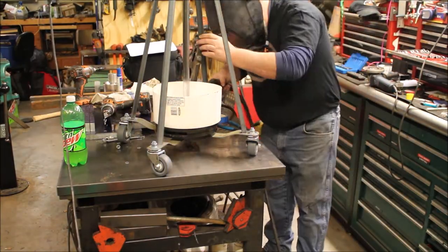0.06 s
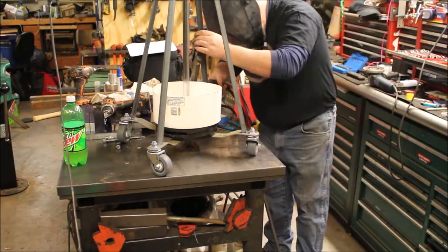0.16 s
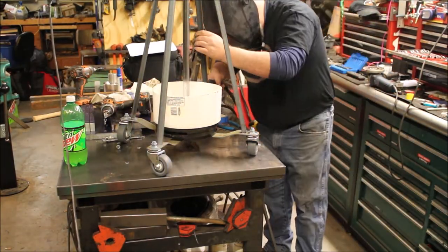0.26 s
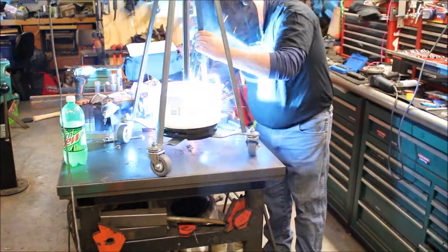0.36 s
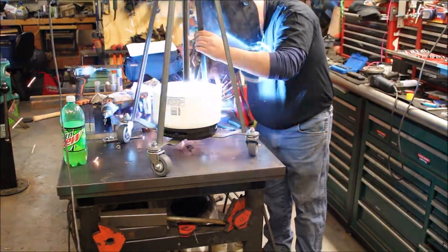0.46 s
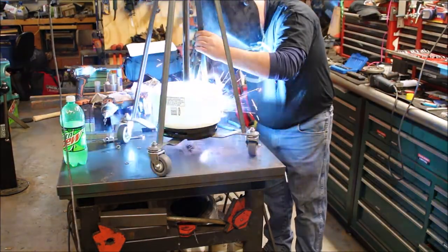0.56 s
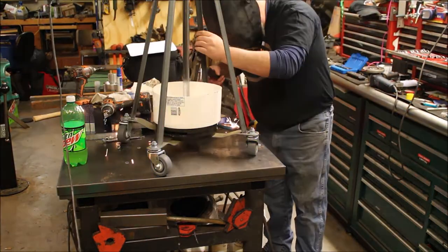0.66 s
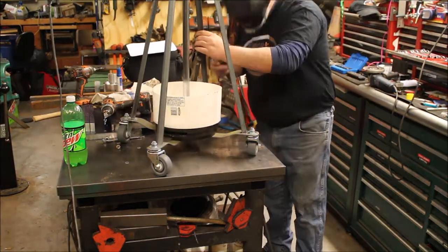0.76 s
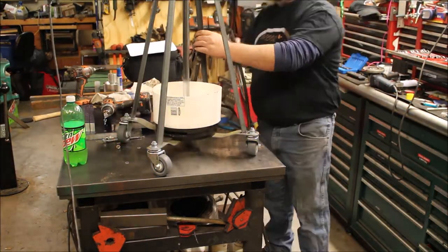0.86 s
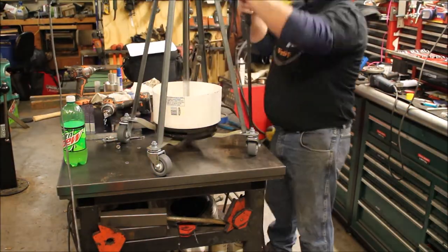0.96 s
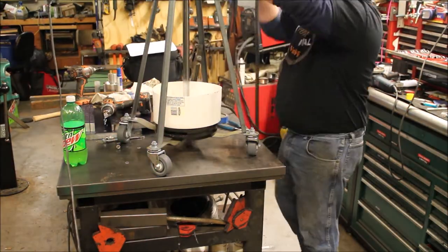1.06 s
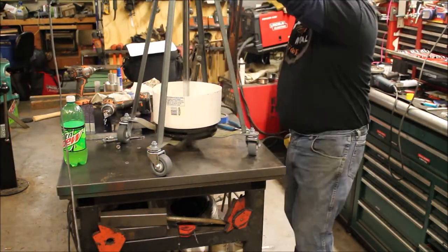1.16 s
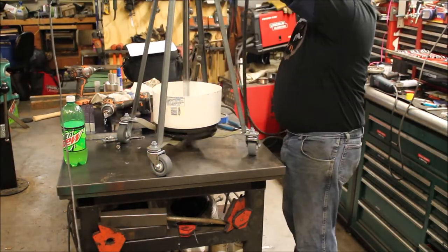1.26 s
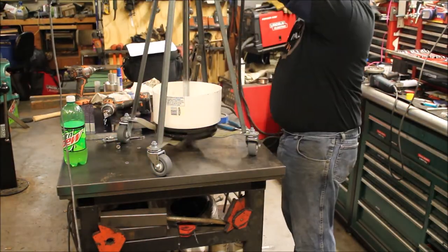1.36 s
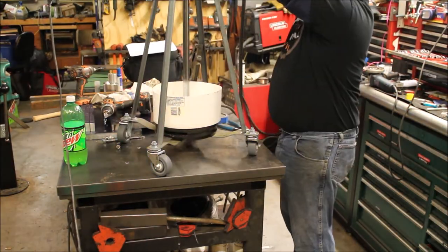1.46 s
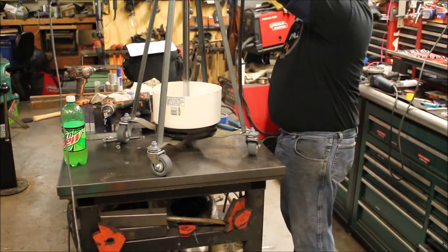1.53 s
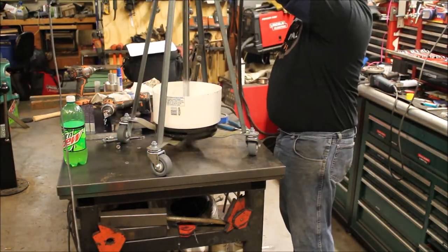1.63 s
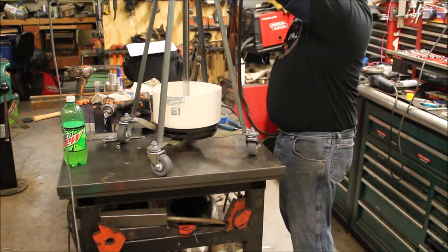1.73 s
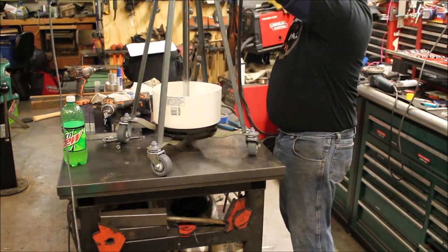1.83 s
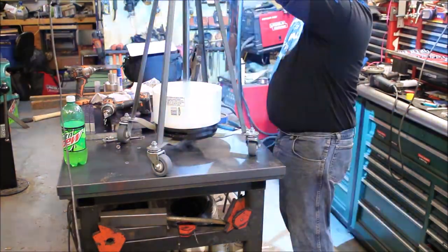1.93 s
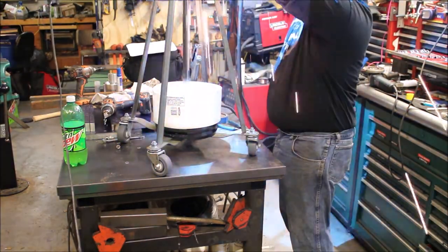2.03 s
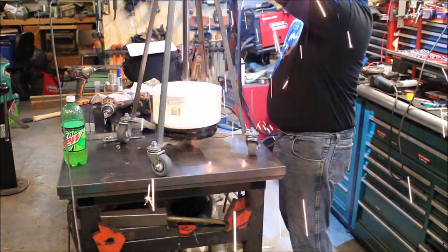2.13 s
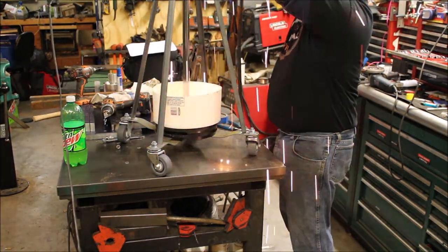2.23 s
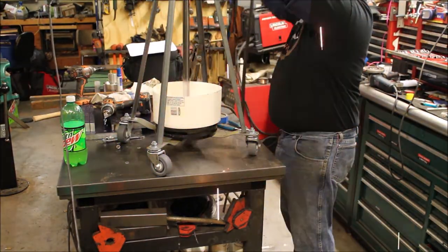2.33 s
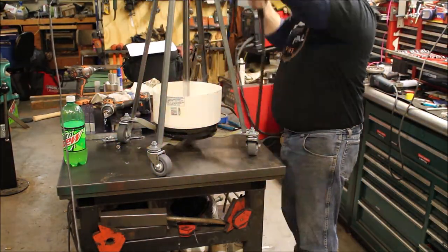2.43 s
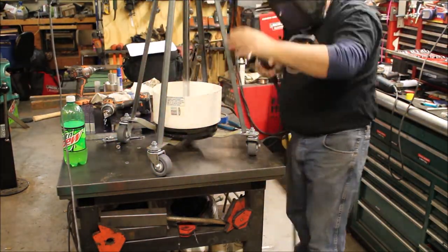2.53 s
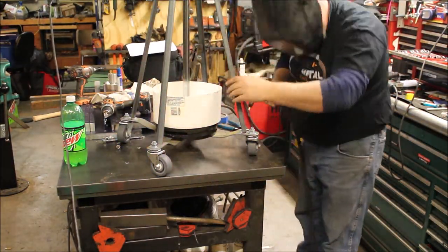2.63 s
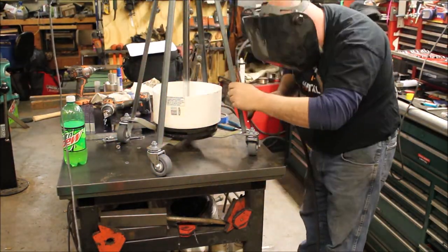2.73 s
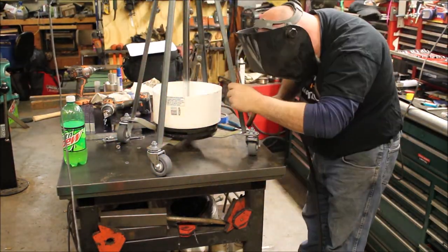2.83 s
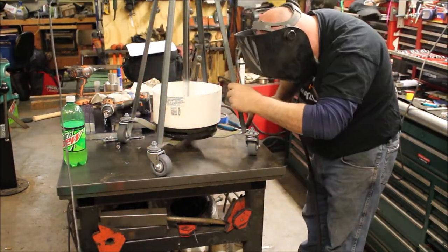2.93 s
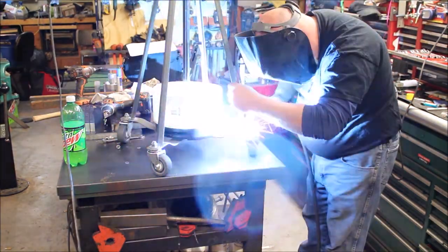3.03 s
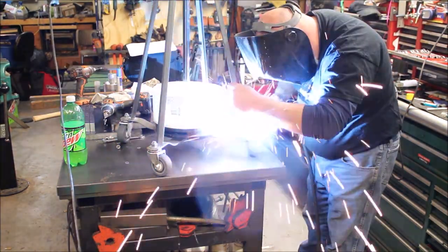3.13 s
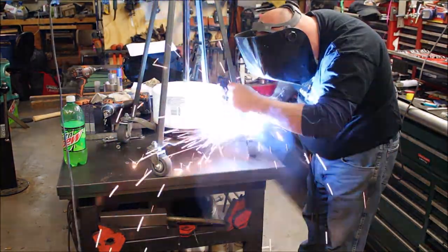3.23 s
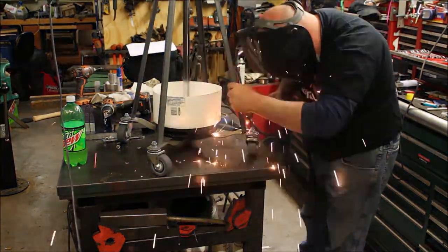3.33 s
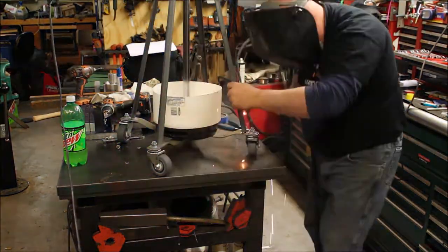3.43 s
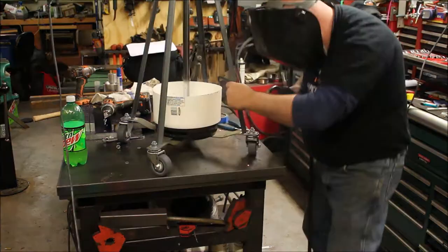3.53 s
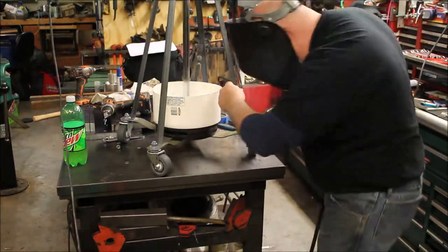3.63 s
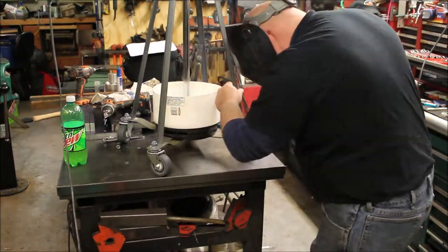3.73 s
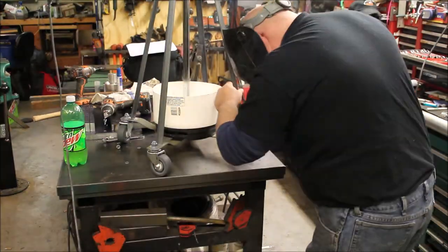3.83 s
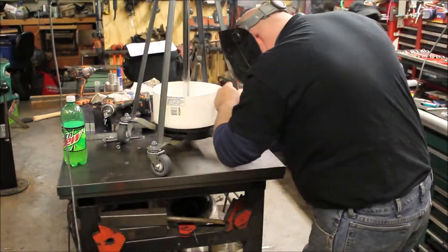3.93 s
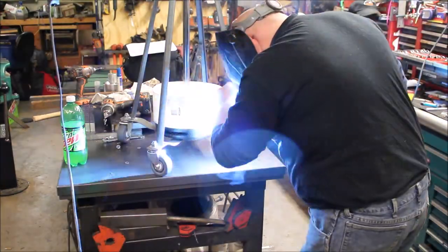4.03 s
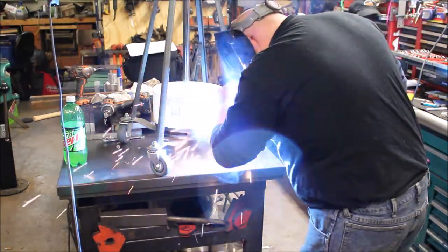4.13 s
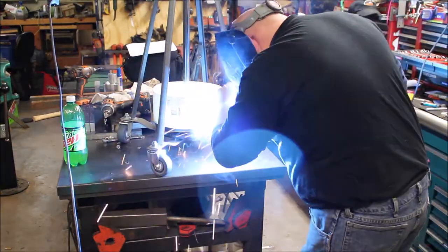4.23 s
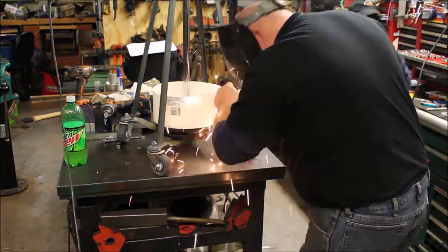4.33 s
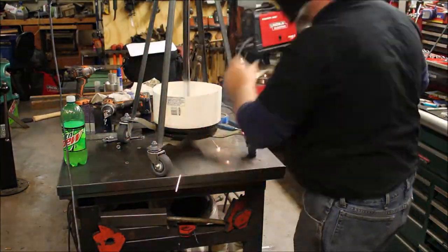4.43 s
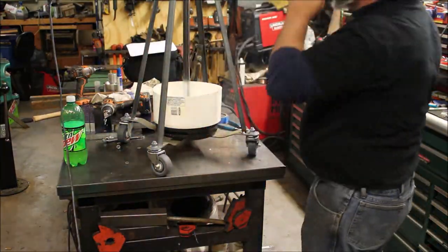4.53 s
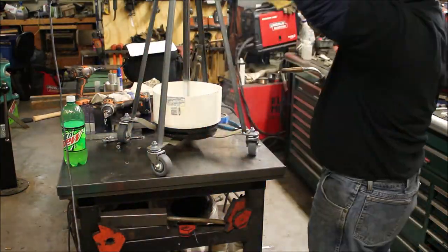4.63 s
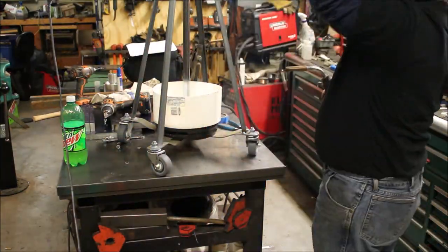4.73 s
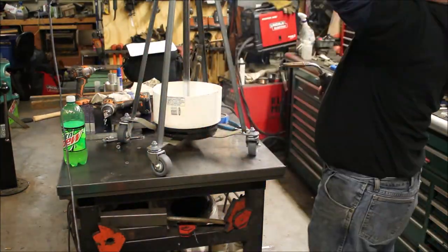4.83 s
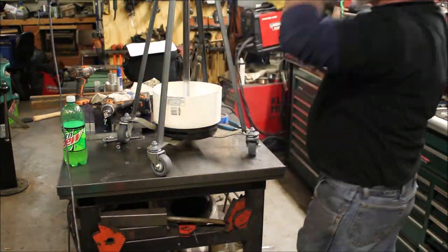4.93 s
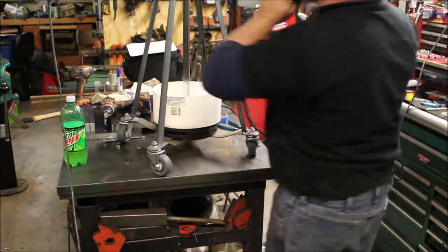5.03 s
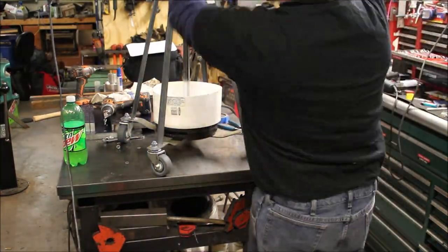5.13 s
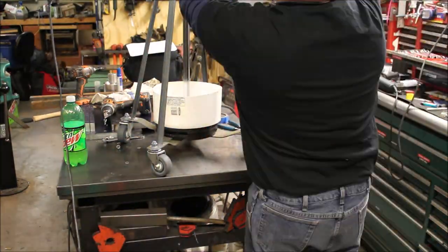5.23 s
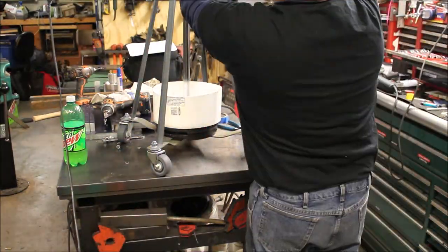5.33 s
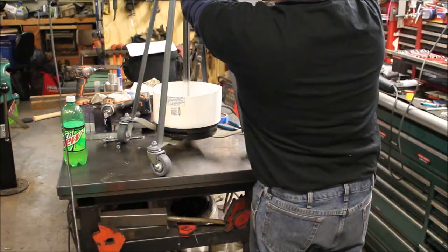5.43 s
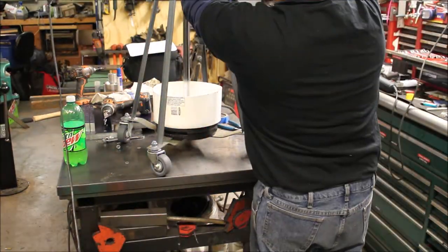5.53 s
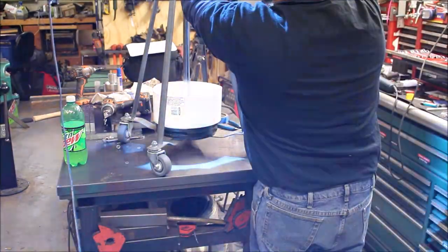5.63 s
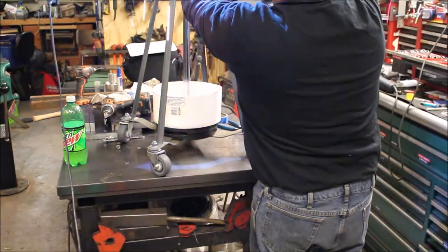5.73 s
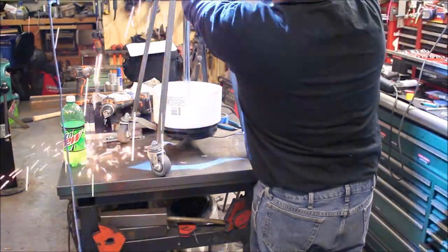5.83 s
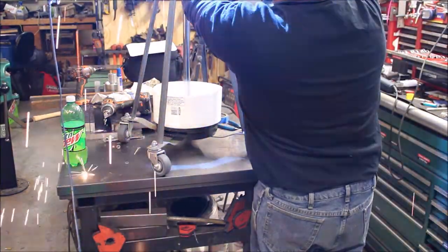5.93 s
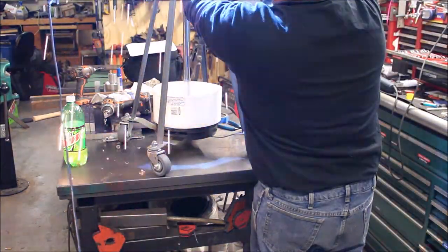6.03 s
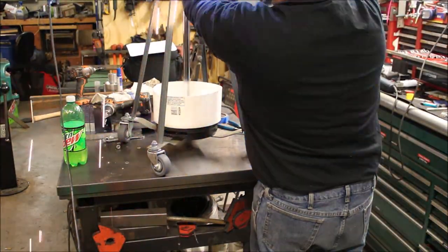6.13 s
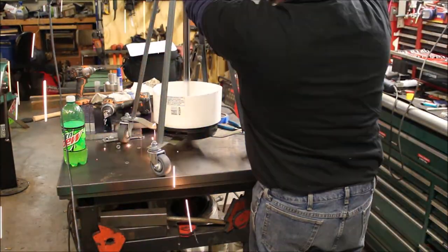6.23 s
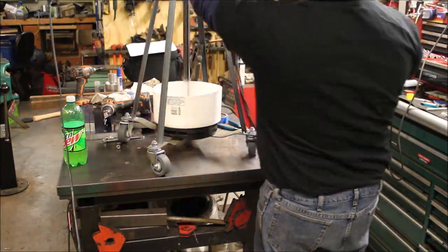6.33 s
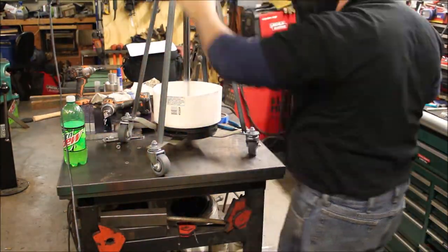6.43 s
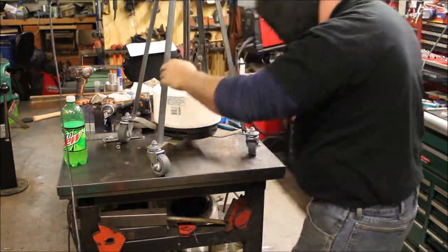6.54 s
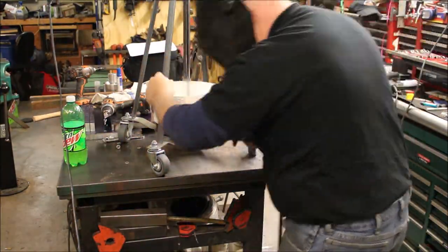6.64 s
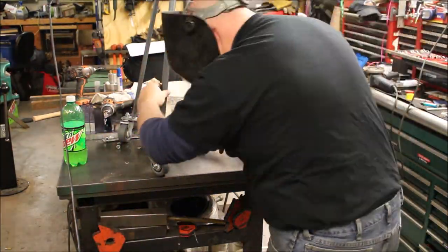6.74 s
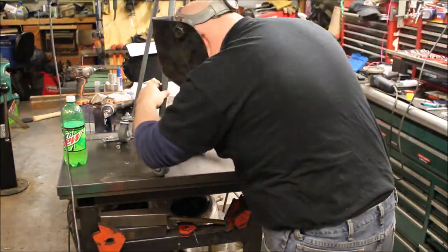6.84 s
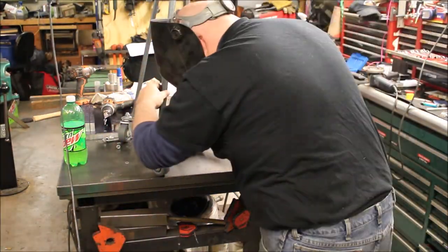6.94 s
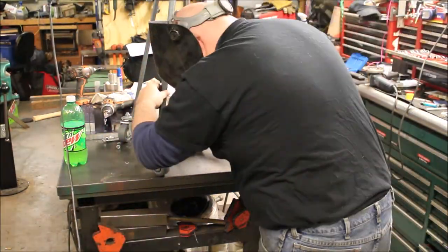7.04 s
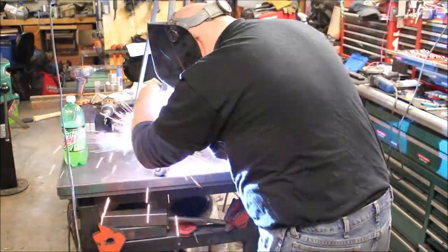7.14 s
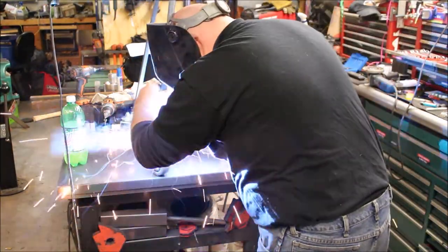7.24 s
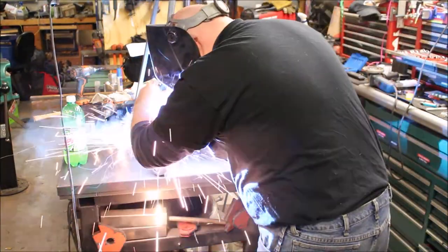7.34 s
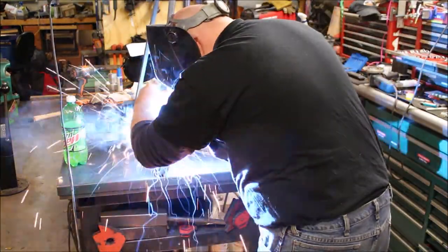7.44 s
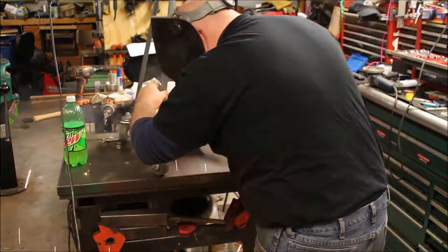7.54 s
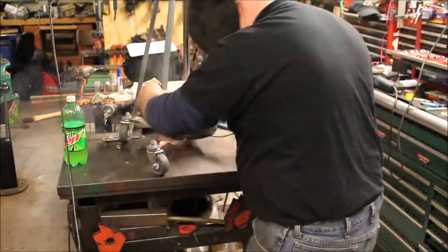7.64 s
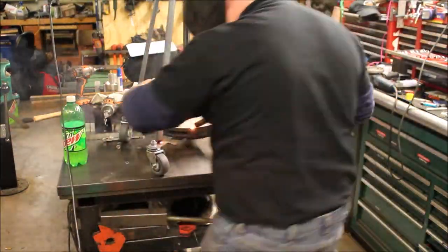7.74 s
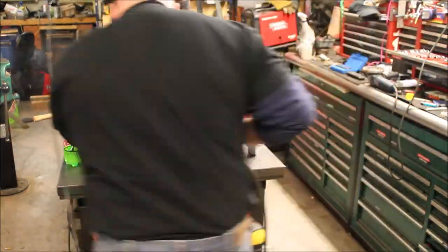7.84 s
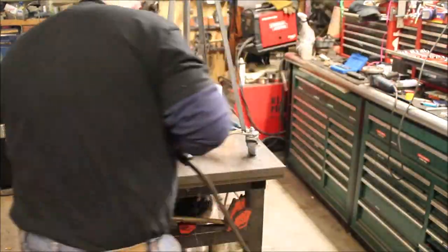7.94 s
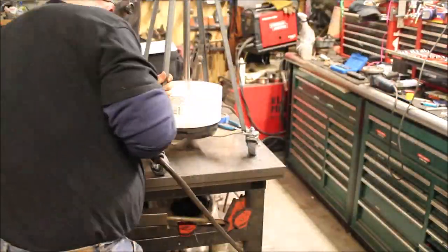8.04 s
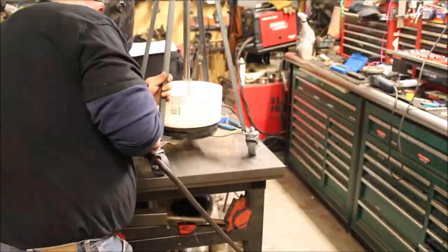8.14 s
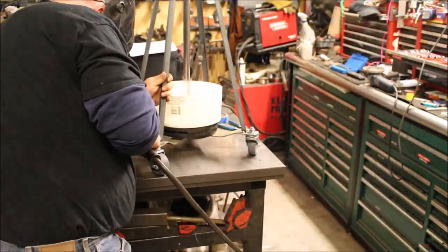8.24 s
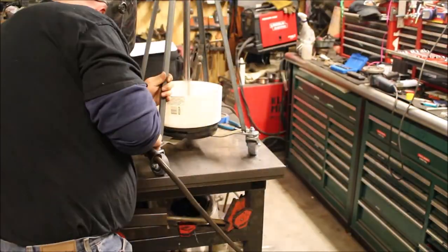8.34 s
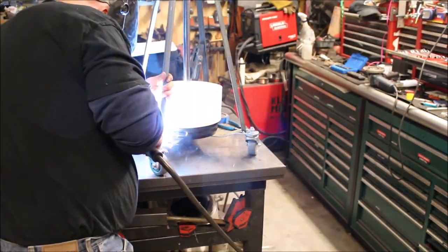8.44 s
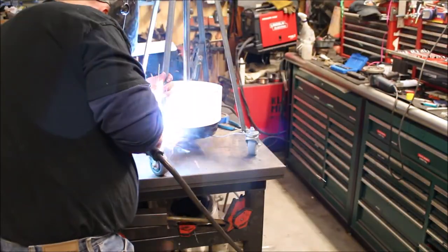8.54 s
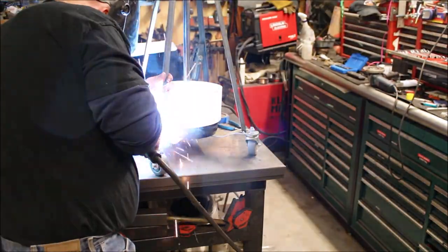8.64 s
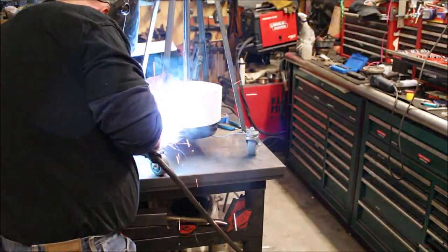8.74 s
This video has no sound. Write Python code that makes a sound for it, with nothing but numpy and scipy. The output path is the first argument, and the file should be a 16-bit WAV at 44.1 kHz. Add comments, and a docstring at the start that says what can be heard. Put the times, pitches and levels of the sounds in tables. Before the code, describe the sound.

A welder moves around a steel frame on a bench, striking one short arc after another, about one every second or so. Each is a loud, gritty burst of snaps and sputter that stops abruptly, with short, dense room echoes. Gear knocks and clothing swishes fill the gaps, with quick dry ticking from the camera's focus motor. The camera microphone squashes the welds and ducks the steady hum, which creeps back each time.

```python
"""A small, crowded shop, where the fan and transformer of a welder hum: seven short MIG tack welds on a steel frame.
Each arc strikes with a sputter, then fries and pops: trains of random shocks, filtered and echoed by the room.
Between welds the gun, helmet and clothes knock and brush (shaped noise), and the frame rings (decaying modes).
The sparks' ultrasound drives the camera's limiter down, so the hum, a sum of wavering sines, swells back
after each weld. The lens motor ticks: a train of impulses excites the modes of the lens."""
import sys
import numpy as np
from scipy import signal
from scipy.fft import rfft, irfft
from scipy.io import wavfile
from scipy.ndimage import uniform_filter1d, map_coordinates

SR = 44100
rng = np.random.default_rng(int(sys.argv[2]) if len(sys.argv) > 2 else 0)


def transcribe(signal):
    """Save signal, clipped to [-1, 1], as a 16-bit WAV file at the path in sys.argv[1]."""
    frames = np.atleast_2d(signal).T
    limited = np.clip(frames, -1, 1)
    pcm = np.round(limited * 32767).astype(np.int16)
    wavfile.write(sys.argv[1], SR, pcm)


N = 387198
TIME = np.arange(N) / SR
MAINS_HZ = 60.02

# All levels apply before the limiter; those of the shocks and knocks also before the room.
# fan and transformer lines: mains_multiple, level_db (rms)
HUM_LINES = [(4, -85.5), (8, -55), (12, -65), (16, -52.5), (20, -75.5), (24, -64.5), (28, -77.5),
             (32, -66.5), (36, -70.5), (40, -67), (44, -83), (48, -85), (52, -81), (56, -73.5), (64, -77.5),
             (72, -86.5), (76, -76.5), (80, -80.5)]
# rush of air in the shop: frequency_hz, relative_level_db (per Hz)
AIR_SPECTRUM = [(20, -14.5), (60, -12), (120, -11), (220, 1), (420, 1.5), (900, -0.5), (2000, 0),
                (3200, -2), (6500, -3.5), (8500, -7.5), (16000, -5)]
AIR_DB = -58.5
# stereo width of the air: frequency_hz, side_over_mid_db
AIR_WIDTH = [(30, -3), (110, -3), (200, -6), (600, 1.5), (2000, 2.5), (16000, -0.5)]
# decay of the room's echoes: frequency_hz, t60_s
ROOM_DECAY = [(200, 0.13), (1200, 0.12), (4000, 0.11), (9000, 0.13), (16000, .12)]

# the lens hunts for focus: start_s, end_s, step_level_db (mean, before the channel gains)
FOCUS_HUNTS = [(0, 1.27, -37.5), (2.605, 3.05, -39), (3.452, 4.05, -39), (4.45, 5.56, -36.5),
               (6.447, 7.09, -37), (7.649, 8.32, -37.5)]
# modes of the lens: frequency_hz, relative_level_db, t60_s
LENS_MODES = [(3780, -15.5, 0.019), (4900, -7.5, 0.01), (5630, -0.5, 0.012), (5470, -1, 0.0031),
              (6600, -26, .005), (8800, -19, 0.0025)]
# sharp clicks in the camera body: time_s, peak_db (before the channel gains)
BODY_CLICKS = [(7.9331, -9), (7.956, -22), (8.0568, -8)]
# colour of these clicks: frequency_hz, relative_level_db (per Hz)
CLICK_SPECTRUM = [(300, -45), (2300, -20), (4000, -6), (5200, -3), (6300, -1.5), (7300, -3), (9500, -13),
                  (16000, -25)]

# gun, cable, helmet and sleeves knock and brush: time_s, thud_db, body_db, swish_db, fade_s
KNOCKS = [(0.054, -75, -47, -40.5, 0.008), (1.14, -48, -50, -57, 0.01), (1.227, -65, -45.5, -51, 0.0056),
          (1.62, -82, -77, -50.5, 0.0074), (2.317, -75, -63, -33, 0.0074), (2.408, -70, -45, -34, 0.011),
          (2.449, -75, -50, -54, 0.15), (2.74, -77, -52, -65, 0.02), (3.417, -77, -52, -48, 0.018),
          (3.577, -67, -56, -72, 0.027), (3.696, -57, -43, -39.5, 0.016), (5.128, -58, -43, -37.5, 0.0071),
          (6.464, -71, -44, -74, 0.0071), (6.556, -77, -59, -47, 0.02), (6.722, -70, -45, -43, 0.017),
          (7.808, -58, -52.5, -72, 0.009), (7.892, -73, -45, -34, 0.036), (8.067, -75, -45, -39.5, 0.0095)]
RISE_SHARE = 0.19  # a brush swells for this share of its fade time
# low colour of a knock: frequency_hz, relative_level_db (per Hz)
THUD_SPECTRUM = [(30, -28), (110, -22), (210, 0), (400, -4), (700, -26), (1300, -1.5), (4000, -37)]
# middle colour of a knock: frequency_hz, relative_level_db (per Hz)
BODY_SPECTRUM = [(100, -29), (500, -1.5), (1300, 1.5), (2300, 5.5), (4500, -3), (16000, -15.5)]
# high colour of a brush: frequency_hz, relative_level_db (per Hz)
SWISH_SPECTRUM = [(500, -38), (2000, -5.5), (4000, -2), (7500, 3), (10000, 0), (13000, 0.5), (16000, -10)]
# the gun touches the steel frame: time_s, peak_db
FRAME_TOUCHES = [(1.205, -29.5), (1.228, -40), (5.389, -33.5)]
# modes of the frame: frequency_hz, relative_level_db, t60_s
FRAME_MODES = [(1257, -2, 0.075), (1372, 0.5, 0.038), (1850, -12, 0.093), (2395, -13, 0.058),
               (3359, -32, 0.13)]

# welds and false starts: start_s, end_s, ultrasound_db (at the microphone), bite_db (around 4 kHz), crackle_db,
# sputter_db (molten wire), strike_db (change of the sputter as the arc strikes)
ARCS = [(0.326, 0.608, -7, 6, -19, -31.5, 11), (1.932, 2.233, -3, 1, -22.5, -41.5, 22.5),
        (3.058, 3.341, -5, -0.5, -21.5, -40.5, 17.5), (4.061, 4.353, -6, 0.5, -19.5, -36, 17.5),
        (5.672, 6.16, 3, 1.5, -17, -35, 20), (7.099, 7.489, -4.5, -1.5, -21, -34, 14.5),
        (8.329, 8.35, -18.5, -1, -33.5, -43, 9), (8.404, 8.42, -20.5, -2.5, -29, -43, -5),
        (8.425, 8.796, -6, -2, -20, -36.5, 5)]
# colour of the crackle: frequency_hz, relative_level_db (per Hz)
CRACKLE_SPECTRUM = [(300, -53.5), (1000, -17), (2500, -10), (3500, -7), (4500, -5.5), (5500, -4),
                    (7000, -7.5), (9500, -4), (12500, 0), (15500, 0.5), (17000, -10)]
# colour of the sputter: frequency_hz, relative_level_db (per Hz)
SPUTTER_SPECTRUM = [(60, -39.5), (200, -34.5), (450, -5), (800, 3), (1200, 1), (1650, 4.5), (2200, 0),
                    (3200, -6), (6000, -16), (16000, -61)]
# the welder sings under load: mains_multiple, level_db (relative to the crackle)
LOAD_LINES = [(13, -30.5), (20, -13.5), (28, -24)]
# loudest bursts of the wire: time_s, level_db
WIRE_BURSTS = [(0.354, -4), (0.4012, 6), (2.0771, 6.5), (3.0605, 10), (3.08, 3), (3.089, 10.5),
               (4.1034, 11), (5.749, 14), (5.7904, 9), (5.845, 12.5), (5.9792, 5), (6.072, 8),
               (6.0975, 5.5), (7.1259, 7.5), (7.155, 9), (7.1665, 11), (7.1743, 9), (7.2488, 6),
               (7.2522, 5), (7.294, 6.5), (7.3492, 7.5), (7.362, 6.5), (7.4446, 6.5), (7.4797, 1),
               (8.4434, 2), (8.4471, 2)]
# colour of a burst: frequency_hz, relative_level_db (per Hz)
POP_SPECTRUM = [(100, -26.5), (600, -9), (2000, -8), (5000, -2), (8000, 4), (13000, 8.5), (17000, -4)]
# the wire stubs on the work and blows clear: time_s, thump_db (peak), crack_db (peak)
WIRE_STUBS = [(0.3528, -32, 6.5), (1.956, -25, -9), (3.08, -38, -6), (4.1034, -30, 3.5), (5.714, -18, -5),
              (5.748, -32, -2), (5.85, -25, -3.5), (5.978, -29.5, -11.5), (7.167, -25.5, -3.5),
              (7.249, -32, -23), (7.348, -34, -16), (8.443, -27, -17)]
# colour of the crack: frequency_hz, relative_level_db (per Hz)
CRACK_SPECTRUM = [(30, -50), (200, -32.5), (650, -7), (1500, -6), (3000, -2), (5800, 1.5), (7200, -18),
                  (16000, -11.5)]
# the wire judders on the steel before it melts: start_s, end_s, level_db (rms)
WIRE_JUDDERS = [(4.07, 4.109, -26), (5.672, 5.678, -12), (7.131, 7.159, -20.5), (8.333, 8.34, -46)]
# modes that the juddering wire excites: frequency_hz, relative_level_db, t60_s
JUDDER_MODES = [(1195, -1.5, 0.16), (1665, 0, 0.12), (1830, -12, 0.025), (2080, -4, 0.13)]

# the cold wire strikes with a sputter that dies away; the crackle takes a share of it
STRIKE_S, STRIKE_CRACKLE_SHARE = 0.032, 0.34
# first shock of a weld, just after contact: levels relative to its crackle plus its strike
STRIKE_DELAY_S, STRIKE_POP_DB, STRIKE_CRACK_DB, STRIKE_THUMP_DB = .0018, 8.5, -4.5, -34
# the sputter surges as the wire dips in, the crackle flares as it blows clear, then the long arc goes quiet
SURGE_LEAD_S, SURGE_S, SURGE_DB = 0.0078, 0.01, 5.5
FLARE_S, FLARE_DB = .02, 5.5
LULL_DELAY_S, LULL_S, LULL_SPUTTER_DB, LULL_CRACKLE_DB = 0.038, 0.028, -10.5, -1.5
# the hand is never quite steady
UNREST_PER_S, UNREST_SPUTTER_DB, UNREST_CRACKLE_DB = 27.55, 2.5, 0.6
# snaps of the wire off the pool, and finer sparks: levels relative to the crackle
SHORTS_PER_S, SHORTS_DB, SPARKS_DB = 280, -2, -4


def gain_of(db):
    """Logarithmic level: decibels to amplitude ratio."""
    return 10 ** (np.asarray(db) / 20)


def evened(x):
    """Normalisation of power: scales to rms 1."""
    return x / np.sqrt(np.mean(x ** 2) + 1e-20)


def read(points, hz):
    """Interpolation of a table along a logarithmic frequency axis."""
    f, value = np.transpose(points)
    return np.interp(np.log(hz + 1), np.log(f + 1), value)


def add(mix, s, sound):
    """Superposition: adds a sound to the mix from time s."""
    part = mix[:, max(round(s * SR), 0):][:, :sound.shape[-1]]
    part += sound[..., :part.shape[1]]


def coloured(x, spectrum, size=2048):
    """Minimum-phase filtering: the Hilbert transform of the log gain gives a causal response, here of energy 1."""
    hz = abs(np.fft.fftfreq(size, 1 / SR))
    log_gain = np.log(gain_of(read(spectrum, hz)))
    response = np.exp(np.conj(signal.hilbert(log_gain)))
    taps = np.fft.ifft(response).real[:size // 2]
    return signal.lfilter(taps / np.linalg.norm(taps), 1, x)


def wander(count, rate):
    """Slow random fluctuation: a spline through normal deviates, rate knots a second."""
    knots = rng.standard_normal(int(count / SR * rate) + 4)
    return map_coordinates(knots, [np.arange(count) * rate / SR], order=3, mode="nearest")


def ring(modes, count=8000):
    """Modal decay: a struck body sounds as a sum of exponentially dying sines, here of peak 1."""
    t = np.arange(count) / SR
    # division by frequency balances the differentiation below
    motion = sum(gain_of(db - 60 * t / t60) * np.sin(2 * np.pi * hz * t) / hz for hz, db, t60 in modes)
    sound = np.diff(motion, prepend=0)
    return sound / abs(sound).max()


def room(x, wet_db, side_db=-7.0, count=11000):
    """Reverberation: dense echoes off benches and tool chests; close microphones differ mainly in the treble."""
    taps = rng.standard_normal((2, count)) * (rng.random((2, count)) < .15)
    taps[:, :25] = 0  # a short gap before the echoes
    hz, t, z = signal.stft(taps, SR, nperseg=256)
    z = z * gain_of(-60 * t / read(ROOM_DECAY, hz)[:, None])
    z[1] *= gain_of(side_db) * np.minimum(hz / 7000, 1)[:, None]
    mid, side = signal.istft(z, SR, nperseg=256)[1]
    response = gain_of(wet_db) * np.array([mid + side, mid - side]) / np.linalg.norm(mid)
    response[:, 0] += 1  # direct sound
    return signal.fftconvolve(x[None], response / np.hypot(1, gain_of(wet_db)), axes=1)


def air():
    """Broadband flow noise: the soft rush of the fan and hiss, narrow in the bass, as filtered noise."""
    hz = np.fft.rfftfreq(N, 1 / SR)
    z = rfft(rng.standard_normal((2, N))) * gain_of(read(AIR_SPECTRUM, hz))
    z[1] *= gain_of(read(AIR_WIDTH, hz))
    mid, side = irfft(z, N)
    return gain_of(AIR_DB + wander(N, 18)) * evened(np.array([mid + side, mid - side]))


def hum(waver_db=0.51, drift=0.018):
    """Harmonic radiation of the idling welder: mains multiples; moving air makes the high ones waver more."""
    lines = np.zeros(N)
    for k, db in HUM_LINES:
        level_db = db + waver_db * k / 16 * wander(N, 15)
        phase = 2 * np.pi * (k * MAINS_HZ * TIME + rng.random()) + drift * k / 8 * wander(N, 16)
        lines += gain_of(level_db) * np.sin(phase)
    return np.sqrt(2) * lines * gain_of([[.3], [-.3]])


def fidgets(per_s=4, level_db=-57, fade=0.013):
    """Friction noise: faint scuffs of boots and cloth at random times as the welder shifts about."""
    t = np.arange(4000) / SR
    scuffs = (rng.random(N) < per_s / SR) * rng.uniform(0.57, 1, N)
    swell = signal.oaconvolve(scuffs, np.exp(-t / fade) * np.minimum(t / 0.0025, 1))[:N]
    grains = swell * rng.standard_normal(N)
    scuffing = coloured(grains, BODY_SPECTRUM) + 1.3 * coloured(grains, SWISH_SPECTRUM)
    return gain_of(level_db) * room(scuffing, wet_db=-6)[:, :N]


def lens(step_share=0.59, rebound_s=0.0012, rebound=0.38):
    """Impulsive excitation: motor steps ring the lens; the body shakes the two microphones in opposition."""
    steps = np.zeros((1, N))
    for start, end, db in FOCUS_HUNTS:
        for s in np.arange(start, end, 1 / 60):  # only step_share of these are heard
            step = gain_of([db + 3.0 * rng.standard_normal()])
            add(steps, s, step * (rng.random() < step_share))
    steps = steps + rebound * np.roll(steps, round(rebound_s * SR))
    out = signal.oaconvolve(steps, ring(LENS_MODES)[None])[:, :N]
    t = np.arange(900) / SR
    for s, db in BODY_CLICKS:
        rattle = coloured(rng.standard_normal(len(t)) * t * np.exp(-t / 0.0011), CLICK_SPECTRUM)
        add(out, s, gain_of(db) * rattle / abs(rattle).max())
    return out * np.array([[1.2], [-.7]])


def handling():
    """Contact noise: knocks and brushes are grainy puffs in three colours; the gun rings the frame."""
    out, t = np.zeros((2, N)), np.arange(SR // 2) / SR
    for s, thud_db, body_db, swish_db, fade in KNOCKS:
        rise = RISE_SHARE * fade
        swell = np.minimum(t / rise, 1) * np.exp(-np.maximum(t - rise, 0) / fade)
        grains = rng.standard_normal(len(t)) * gain_of(5.9 * wander(len(t), 302.3)) * swell
        grains = grains * np.linalg.norm(swell) / np.linalg.norm(grains)
        puff = gain_of(thud_db) * coloured(grains, THUD_SPECTRUM)
        puff += gain_of(body_db) * coloured(grains, BODY_SPECTRUM)
        puff += gain_of(swish_db) * coloured(grains, SWISH_SPECTRUM)
        add(out, s, room(puff, wet_db=-1))
    for s, db in FRAME_TOUCHES:
        add(out, s, gain_of(db) * room(ring(FRAME_MODES), wet_db=-12.5))
    return out


def judder(duration_s, db):
    """Stick-slip friction: random slips of the wire excite modes in the steel."""
    slips = rng.standard_normal(round(duration_s * SR))
    rub = evened(signal.fftconvolve(slips, ring(JUDDER_MODES))[:len(slips)])
    return gain_of(db) * room(rub * signal.windows.tukey(len(slips), .3), wet_db=-6.0)


def pop(db):
    """Explosive impulse: a bright shock of bursting wire, with a spray of droplets just after it."""
    t = np.arange(1500) / SR
    spray = 0.26 * rng.standard_normal(len(t)) * np.exp(-t / 0.00065)
    return gain_of(db) * room(coloured(signal.unit_impulse(len(t)) + spray, POP_SPECTRUM), wet_db=2)


def stub(thump_db, crack_db):
    """Blast wave: the wire blows clear with a crack and a low push of air, positive then negative."""
    t = np.arange(1500) / SR
    u = t / 0.0015
    push = (1 - u) * np.exp(-u)
    crack = coloured(rng.standard_normal(len(t)) * np.exp(-t / 0.0009), CRACK_SPECTRUM)
    crack = crack / abs(crack).max()
    return gain_of(crack_db) * room(crack, wet_db=-8.5) + gain_of(thump_db) * room(push, wet_db=-12)


def sparks(t, per_s, spread_db, ripple):
    """Modulated random process: tiny uneven shocks, bunched on the crests of the rectified mains."""
    chance = per_s / SR * (1 + ripple * np.cos(4 * np.pi * MAINS_HZ * t))
    size = gain_of(spread_db * np.minimum(rng.exponential(1, len(t)), np.e))
    shocks = size * (rng.random(len(t)) < chance)
    return shocks / np.sqrt(uniform_filter1d(shocks ** 2, size=1800) + 1e-3)


def shorts(count, jitter=.22, spread_db=4):
    """Quasi-periodic excitation: the wire touches the pool and snaps off at a fairly even pace; rms about 1."""
    gaps, sizes = rng.standard_normal((400, 2)).T
    at = (np.cumsum(np.exp(jitter * gaps)) * SR / SHORTS_PER_S).astype(int)
    shocks = np.bincount(at, gain_of(spread_db * np.clip(sizes, -2, 2)), count)[:count]
    return shocks / np.sqrt(uniform_filter1d(shocks ** 2, size=2400) + 1e-6)


def burn(t, crackle_db, sputter_db, strike_db):
    """Level modulation of crackle and sputter: the strike, then surge, flare and lull around each stub."""
    since = t[:, None] - np.transpose(WIRE_STUBS)[0]
    strike = strike_db * np.exp(-((t - t[0]) / STRIKE_S) ** 2)
    surge = np.exp(-((since + SURGE_LEAD_S) / SURGE_S) ** 2).max(1)
    flare = ((since > 0) * np.exp(-abs(since) / FLARE_S)).max(1)
    lull = np.exp(-((since - LULL_DELAY_S) / LULL_S) ** 2).max(1)
    unrest = wander(len(t), UNREST_PER_S)
    crackle_db = crackle_db + STRIKE_CRACKLE_SHARE * strike + FLARE_DB * flare
    crackle_db = crackle_db + LULL_CRACKLE_DB * lull + UNREST_CRACKLE_DB * unrest
    sputter_db = sputter_db + strike + SURGE_DB * surge
    sputter_db = sputter_db + LULL_SPUTTER_DB * lull + UNREST_SPUTTER_DB * unrest
    return crackle_db, sputter_db


def arc(start, end, ultrasound_db, bite_db, *levels_db):
    """Electric discharge: snapping shorts in bright crackle, duller sputter, a load tone and ultrasound."""
    t = np.arange(start, end, 1 / SR)
    crackle_db, sputter_db = burn(t, *levels_db)
    colour = [(hz, db + bite_db * np.exp(-np.log2(hz / 4200) ** 2)) for hz, db in CRACKLE_SPECTRUM]
    crackle = gain_of(crackle_db + SPARKS_DB) * evened(coloured(sparks(t, 1400, 2.4, 0.44), colour))
    snaps = gain_of(crackle_db + SHORTS_DB) * coloured(shorts(len(t)), colour)
    sputter = gain_of(sputter_db) * evened(coloured(sparks(t, 1600, 2.5, .4), SPUTTER_SPECTRUM))
    tone = np.zeros(len(t))
    for k, db in LOAD_LINES:
        level_db = db + crackle_db + 2 * wander(len(t), 50)
        tone += gain_of(level_db) * np.sin(2 * np.pi * k * MAINS_HZ * t + .5 * wander(len(t), 70))
    ignition = np.minimum((t - start) / .002, 1)
    sound = room(ignition * (crackle + sputter), wet_db=3.5) + room(ignition * snaps, wet_db=-0.5)
    highpass = signal.ellip(8, 1, 100, 18500, "high", fs=SR, output="sos")
    ultrasound = evened(signal.sosfilt(highpass, rng.standard_normal(len(t))))
    add(sound, 0, tone * signal.windows.tukey(len(t), .12))
    add(sound, 0, gain_of(ultrasound_db) * ultrasound * signal.windows.tukey(len(t), .004))
    return sound


def welding():
    """Superposition of all arcs with the first shock of each, the bursts, stubs and judders of the wire."""
    out = np.zeros((2, N))
    for start, end, ultrasound_db, bite_db, crackle_db, sputter_db, strike_db in ARCS:
        add(out, start, arc(start, end, ultrasound_db, bite_db, crackle_db, sputter_db, strike_db))
        shock_db = crackle_db + strike_db
        shock = pop(shock_db + STRIKE_POP_DB)
        shock = shock + stub(shock_db + STRIKE_THUMP_DB, shock_db + STRIKE_CRACK_DB)
        add(out, start + STRIKE_DELAY_S, shock)
    for s, db in WIRE_BURSTS:
        add(out, s, pop(db))
    for s, thump_db, crack_db in WIRE_STUBS:
        add(out, s, stub(thump_db, crack_db))
    for start, end, db in WIRE_JUDDERS:
        add(out, start, judder(end - start, db))
    return out


def scene():
    """Superposition of all sources as they reach the camera."""
    return air() + hum() + fidgets() + lens() + handling() + welding()


def record(dry, limit_db=-20, recovery_db_per_s=55):
    """Gain control: a limiter clamps at once and recovers steadily; a low-pass then removes the ultrasound."""
    power_db = 10 * np.log10(abs(uniform_filter1d((dry ** 2).mean(0), size=180)) + 1e-12)
    fall = TIME * recovery_db_per_s
    held_db = np.maximum.accumulate(power_db + fall) - fall  # peaks held, sinking steadily
    over_db = np.maximum(held_db - limit_db, 0)
    limited = dry / gain_of(uniform_filter1d(over_db, size=40))
    lowpass = signal.firwin(511, 15900, window=("kaiser", 11), fs=SR)
    return signal.oaconvolve(limited, lowpass[None], "same")


dry = scene()
out = record(dry)
transcribe(out)
```